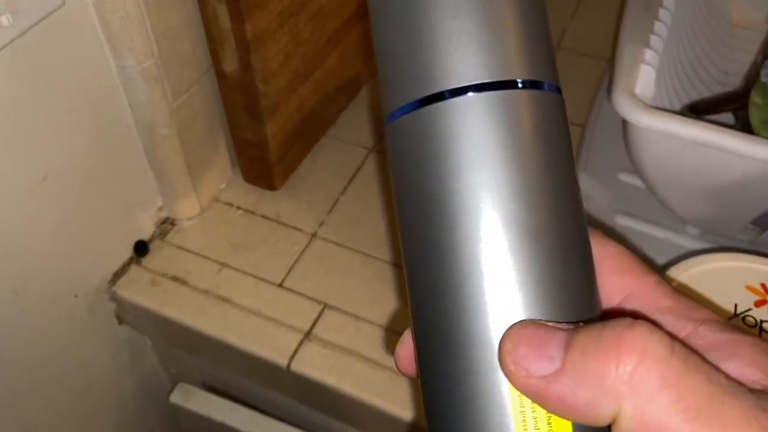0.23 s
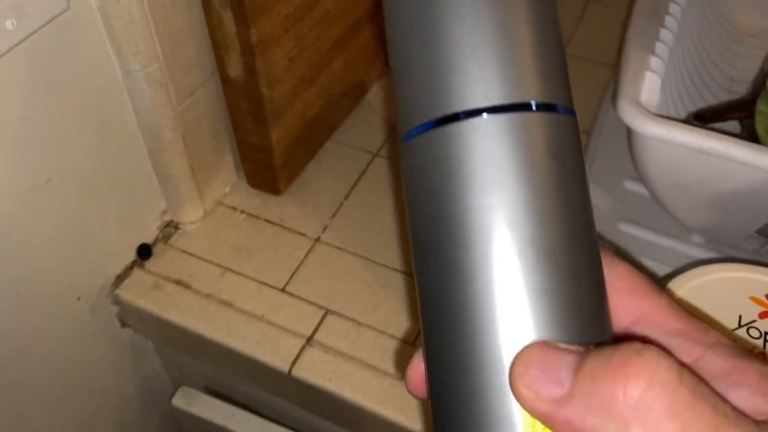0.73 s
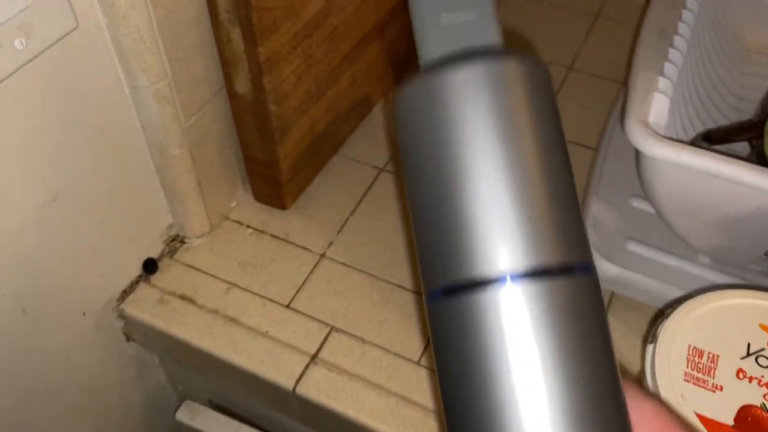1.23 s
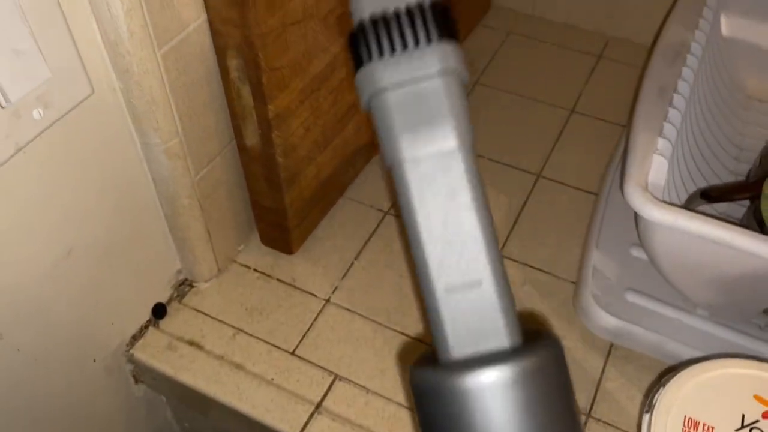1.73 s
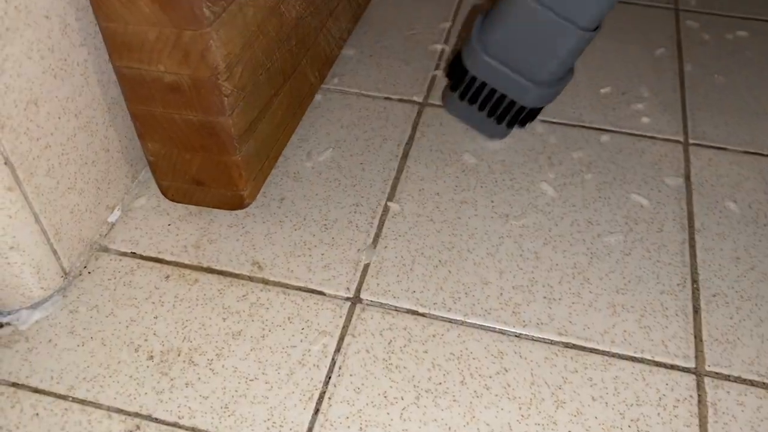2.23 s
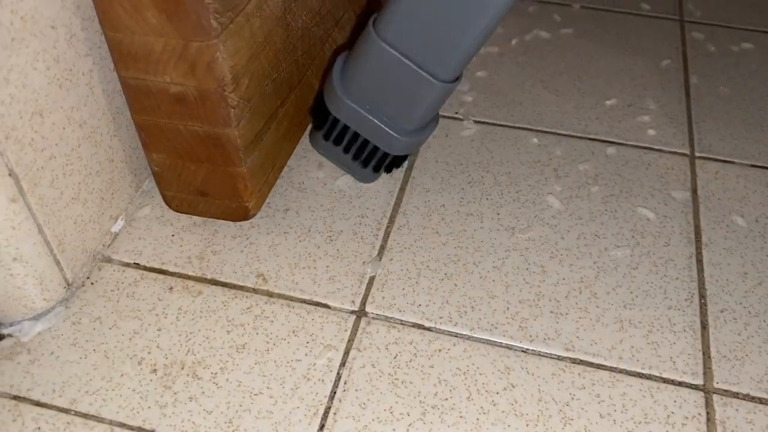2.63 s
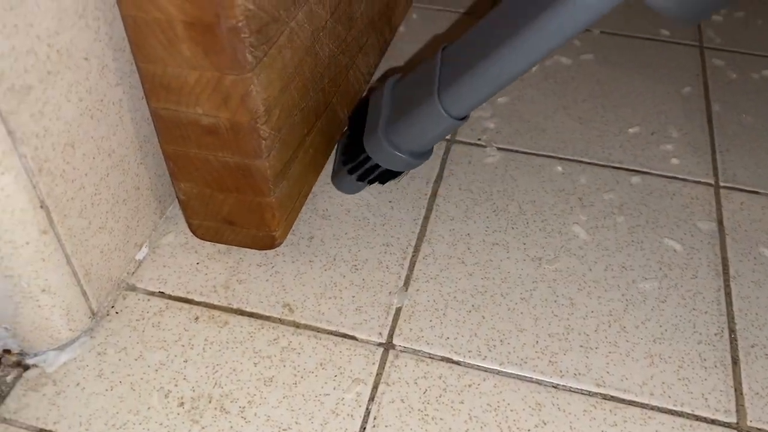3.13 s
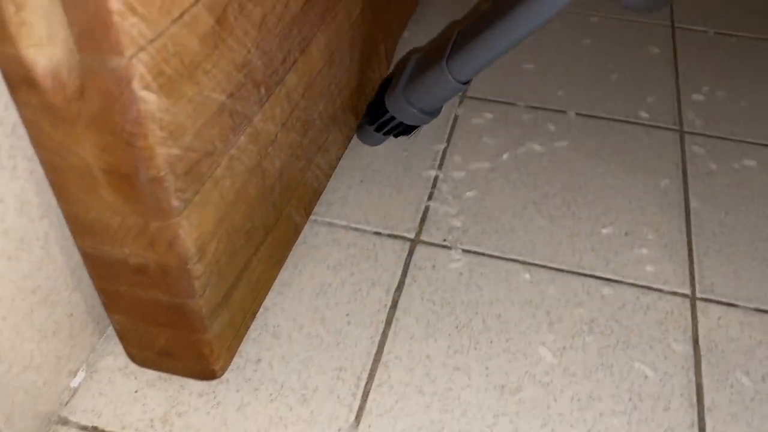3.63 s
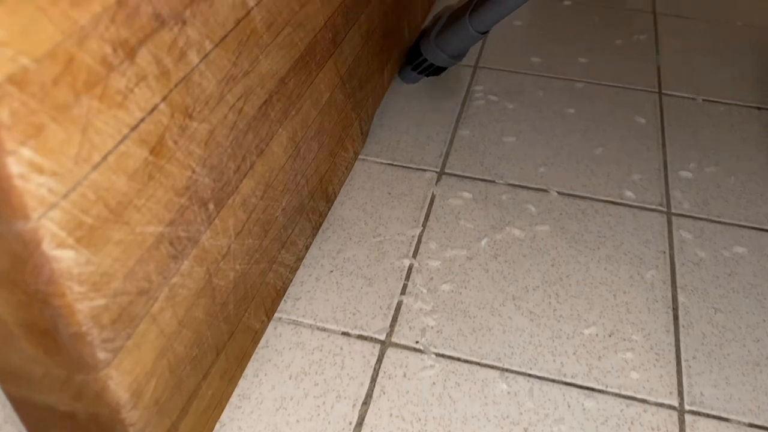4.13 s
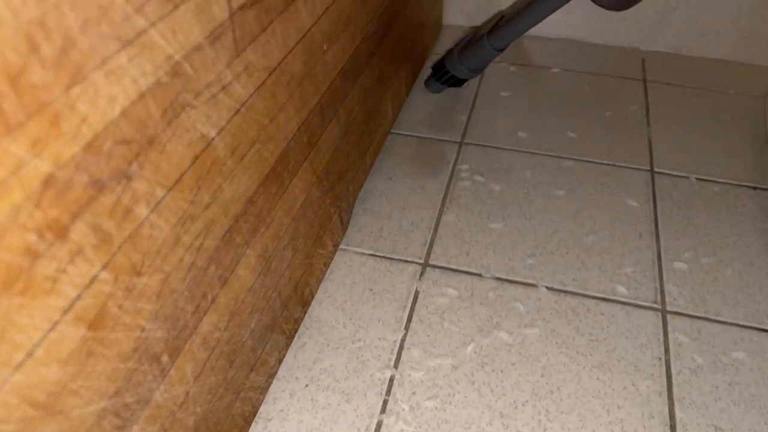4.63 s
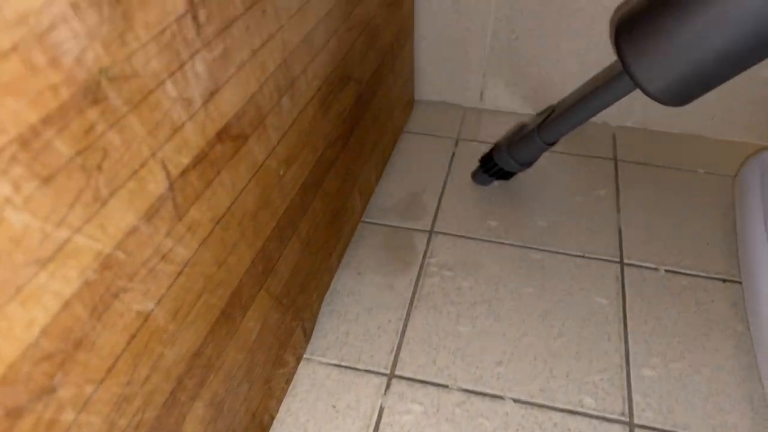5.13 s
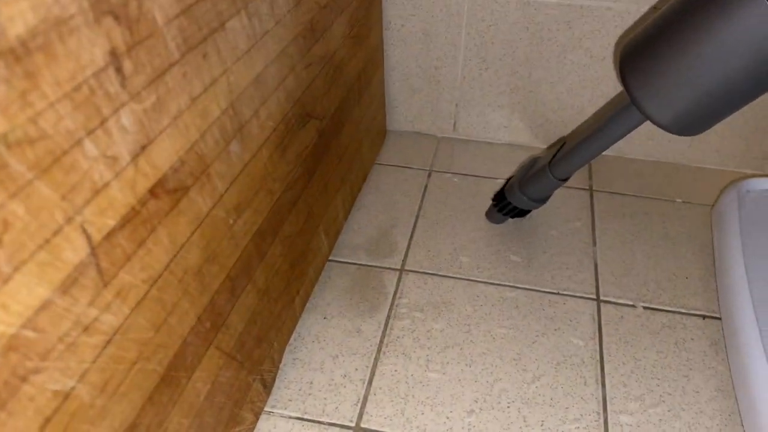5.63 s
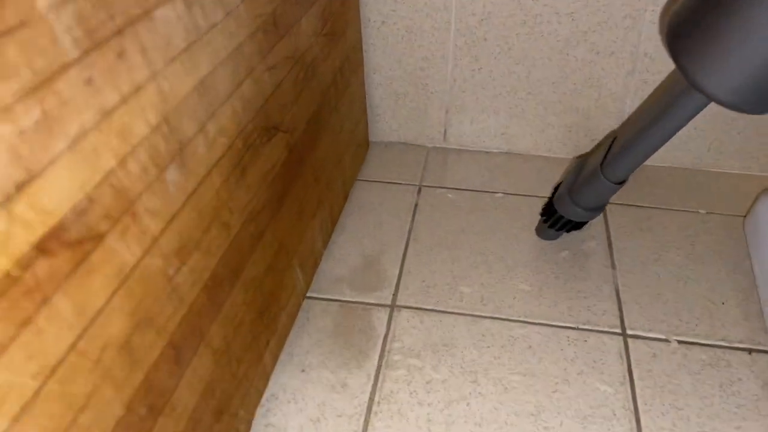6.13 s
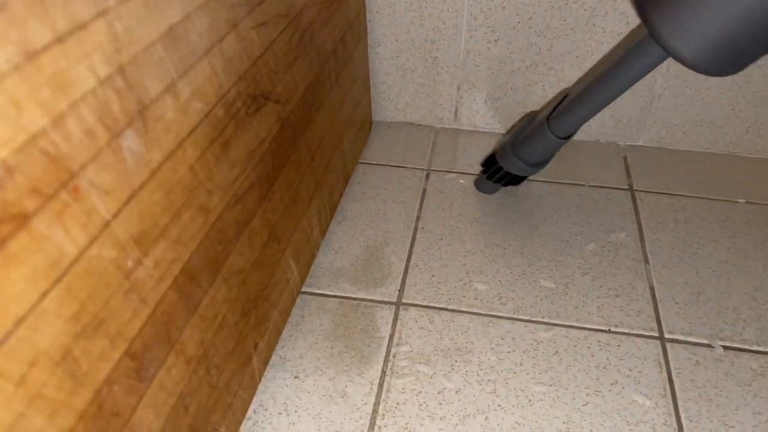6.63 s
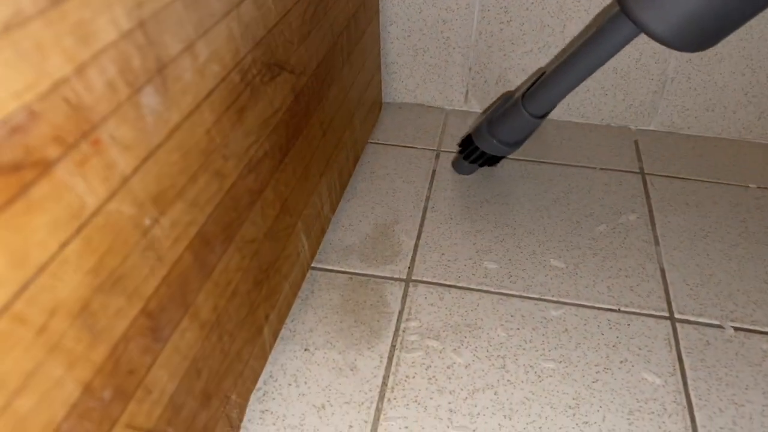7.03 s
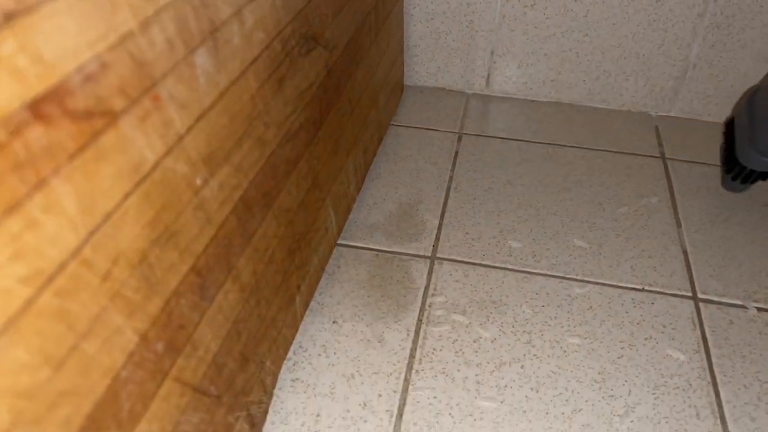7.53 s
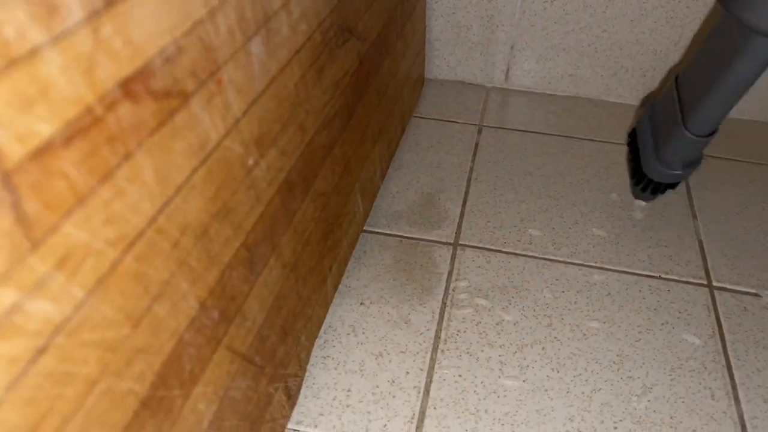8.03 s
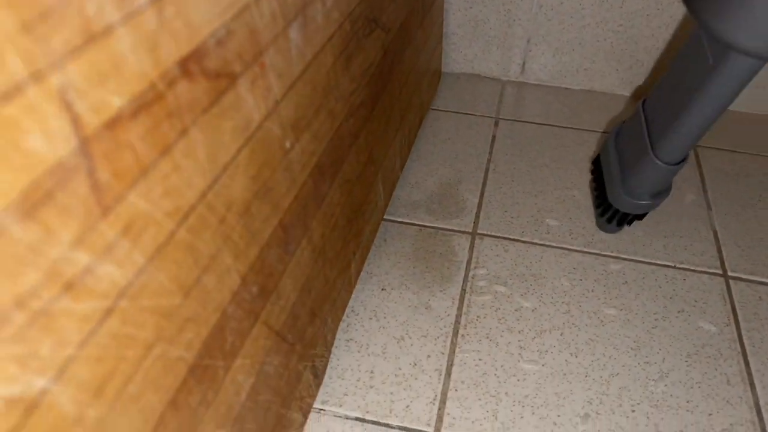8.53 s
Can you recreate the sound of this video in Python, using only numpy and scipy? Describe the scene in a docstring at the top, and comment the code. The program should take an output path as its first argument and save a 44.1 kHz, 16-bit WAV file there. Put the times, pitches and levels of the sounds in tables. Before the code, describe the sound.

From 0 to 1.9 seconds a small hard-surfaced room is quiet: a distant appliance hums low with a rapid throb, under faint hand and clothing rustle. Fingers tick the plastic shell lightly; two dull thumb taps and a small switch spring-back come around 0.3 to 0.37, with a clearer click at 1.38 and small ticks near 1.65. A tiny silence follows at 1.9, then a handheld vacuum is instantly at full speed, close and loud, with no spin-up. Steady high whine in several pitches wavers over a bright rush of air whose hollow resonances glide as the nozzle moves. Grit cracks sharply, mostly from 2.1 to 3.5, strongest near 3.24, with more at 6.1, 6.54, 6.75 and 8.5. The lowest whine swells after 6.4. A rapid cluster of hollow bumps lands at 7.3; higher whine surges near 8.05, and the vacuum is still running at 8.8.

```python
"""Handheld vacuum in a small tiled room

Heard through a close microphone pair: a distant appliance hums in throbs under a few finger ticks and taps.
After a brief silence the vacuum is at full speed: sines on shaft orders whine, and coloured noise is the air.
Noise cracks ring the cup as grit and the tube as crumbs; struck decaying modes are bumps on something hollow.
Gliding resonances and short echoes shift the colour of the air as the nozzle moves along floor and corners."""
import sys
import numpy as np
from scipy import signal
from scipy.fft import rfft, irfft, next_fast_len
from scipy.io import wavfile
from scipy.ndimage import map_coordinates

SR = 44100
rng = np.random.default_rng(int(sys.argv[2]) if len(sys.argv) > 2 else 0)


def digitize_waveform(pressure):
    """Quantize a signal to 16-bit integers and store it at the path in sys.argv[1].

    Rows of a 2-D input are taken as channels; values are limited to [-1, 1].
    """
    field = np.atleast_2d(pressure).T
    bounded = np.clip(field, -1, 1)
    quanta = np.round(bounded * 32767).astype(np.int16)
    wavfile.write(sys.argv[1], SR, quanta)


N = 387198

T = np.arange(N) / SR
AIR_TOP_HZ = 15750
# silence before the vacuum: (start t/s, end t/s)
SILENCE = (1.8935, 1.914)
# airflow, each level heard against its own mean over time:
# (t/s, lows level/dB, mids level/dB, upper mids level/dB, treble level/dB, left minus right/dB)
AIR_PATH = [(1.93, -34.5, -35.5, -38, -28.5, 3), (2.04, -40.5, -33, -41, -31, 3),
            (2.1, -37, -32.5, -40, -30.5, 1.5), (2.63, -37, -33.5, -38, -36, 2),
            (3.32, -34, -31.5, -33, -31.5, 1.5), (3.64, -31, -32.5, -33.5, -31.5, 2.5),
            (4.59, -39, -31.5, -35.5, -32, 4), (5.07, -38, -30.5, -31.5, -32, 2.5),
            (5.42, -42.5, -29.5, -33, -32, 3), (6.39, -37.5, -32.5, -29.5, -30.5, 3.0),
            (6.56, -37.5, -28, -29.5, -29, 3), (7.11, -37.5, -28.5, -32, -32, 4),
            (7.34, -35.5, -30, -33, -29.5, 6), (7.4, -37.5, -31, -33, -30, 1.5),
            (7.61, -37.5, -31.5, -35.5, -31, 4), (7.89, -36.5, -33, -29.5, -32, 4.5),
            (8.01, -37.5, -33.5, -32, -32, 3), (8.77, -36.5, -37, -32, -31, 6)]


def from_db(db):
    """Decibels to gain."""
    return 10 ** (np.asarray(db) / 20)


def in_time(rows, t=T):
    """Columns of a table, joined by straight lines."""
    s, *columns = np.transpose(rows)
    return np.array([np.interp(t, s, c) for c in columns])


def drift(rate, count):
    """Rows of smooth chance through knots of spread 1, rate knots per second."""
    knots = rng.standard_normal((count, 400))
    places = np.meshgrid(np.arange(count), T[::64] * rate, indexing="ij")
    return map_coordinates(knots, places, order=3).repeat(64, axis=1)[:, :N]


def patchwork(shape, hz, s, patch_hz, patches_per_s):
    """Chance over frequency and time, joined by straight lines."""
    places = np.meshgrid(hz / patch_hz, s * patches_per_s, indexing="ij")
    return map_coordinates(rng.standard_normal(shape), places, order=1)


def pair(near, far):
    """The right port hears the left one's sound turned in phase, blended with unrelated room sound."""
    # microphone pair, the treble arriving about a quarter millisecond later on the left:
    # (f/Hz, likeness/0-1, right lead/rad)
    ports = [(0, 1, -0.5), (185, 0.82, 0.25), (540, 0.86, 1.63), (815, 0.74, 1.42), (1010, 0.8, 0.99),
             (1300, 0.48, 1.56), (1690, 0.47, 2.5), (2040, 0, 5.5), (2520, 0.78, 5), (3400, 1, 5.4),
             (4500, 1, 5.5), (4830, 0.98, 6.5), (5670, 0.54, 9), (5890, 0.1, 7.5), (6170, 1, 5),
             (15180, 1, 19), (17100, 0.6, 57)]
    size = next_fast_len(N)
    alike, lead = in_time(ports, np.fft.rfftfreq(size, 1 / SR))
    alike = np.clip(alike, 0, 1)
    shared = alike * np.exp(1j * lead) * rfft(near, size)
    unrelated = np.sqrt(1 - alike ** 2) * rfft(far, size)
    return np.array([near, irfft(shared + unrelated, size)[:N]])


def shaped_noise(colour, change):
    """Stereo noise of rms about 1 in a colour, then a gain for every frequency and moment."""
    hz, s, cells = signal.stft(pair(*rng.standard_normal((2, N))), SR, nperseg=1024)
    hz = np.maximum(hz, 1)
    colour_hz, colour_db = np.transpose(colour)
    shape_db = np.interp(np.log(hz), np.log(colour_hz), colour_db)
    shape = from_db(shape_db - 35 * (hz > AIR_TOP_HZ))
    shape /= np.sqrt(np.mean(shape ** 2))
    cells = cells * shape[:, None] * change(hz, s)
    return signal.istft(cells, SR)[1][:, :N]


def bursts(events, modes, tail_db):
    """Each event is a sharp crack of noise with a longer tail; both ring the broad modes of a body."""
    length = 8000
    t = T[:length]
    puffs = np.zeros((2, N)) + 1e-18
    rise = np.minimum(t / .0008, 1)
    noise = rng.standard_normal((len(events), 2, length)) * rise
    for (s, strike_db, t60), puff in zip(events, noise):
        i = int(s * SR)
        fall_db = 60 * t / max(t60, .005)
        decay = from_db(-4 * fall_db) + from_db(tail_db - fall_db)   # crack, then tail
        puffs[:, i:i + length] += (puff * from_db(strike_db) * decay)[:, :N - i]
    out = 0
    for k, (hz, width_hz, level_db) in enumerate(modes):
        r = np.exp(-np.pi * width_hz / SR)
        feed = np.array([1, 0, -1]) * (1 - r * r) / 2
        ring = [1, -2 * r * np.cos(2 * np.pi * hz / SR), r * r]
        boost = np.sqrt(SR / width_hz) / 8   # narrow modes take less of the noise
        out = out + (-1) ** k * boost * from_db(level_db) * signal.lfilter(feed, ring, puffs)
    return pair(*out)


def hum():
    """Distant appliance: harmonics of a slow beat, so the hum throbs; both ports hear it alike."""
    # harmonics: (multiple of the beat, level/dB before swell)
    harmonics = [(3, -67), (6, -44), (7, -61), (8, -49), (9, -40), (10, -53), (11, -54.5), (12, -53.5),
                 (13, -48), (14, -62), (15, -51), (17, -43.5), (18, -45), (19, -52), (23, -56), (24, -57),
                 (26, -59), (27, -56), (28, -58), (32, -64), (33, -64), (35, -68), (38, -72), (39, -63.5),
                 (47, -70), (48, -64)]
    # swell, each level heard against its own mean: (t/s, low orders level/dB, upper orders level/dB)
    swells = [(0, -36, -42.5), (1.7, -35, -43), (2.7, -38.5, -40), (4.3, -37, -39), (5.3, -36, -35),
              (6.0, -36.5, -37.5), (6.4, -33.5, -35), (8.78, -37.5, -38.5)]
    beat_hz = 9.645
    low_db, upper_db = in_time(swells)
    out = 0
    for (k, level_db), start in zip(harmonics, rng.uniform(0, 2 * np.pi, len(harmonics))):
        swell_db = low_db - low_db.mean() if k < 11 else upper_db - upper_db.mean()
        waver = drift(2.96, count=2)
        phase = 2 * np.pi * k * beat_hz * T + start + 0.25 * waver[1]
        out = out + np.sqrt(2) * from_db(level_db + swell_db + 1.2 * waver[0]) * np.sin(phase)
    return out


def room_tone():
    """Steady rumble below, a faint flickering rustle of hand and clothes and thin whistles above."""
    # quiet room: (f/Hz, relative level/dB per Hz)
    room_colour = [(25, -12), (45, -11.5), (100, 2.5), (150, -9.5), (205, -15), (270, -9), (400, -22),
                   (600, -20.5), (900, -32.5), (2000, -37), (3000, -43), (4500, -46), (9000, -48),
                   (14000, -45), (15700, -44)]
    # rustle around 1.8 kHz: (t/s, boost level/dB)
    rustle = [(0, -0.5), (.3, 2.5), (.6, 1.5), (.9, 2.5), (1.2, 2.5), (1.45, 5.5), (1.7, 8), (1.89, 6.5)]
    # thin unsteady whistles: (f/Hz, starting level/dB, fade/dB per s, wobble/rad)
    thin_tones = [(2590, -71, 1.5, 2.5), (3150, -79, 0, 5), (3548, -77, 0, 3), (4560, -80, 0, 6)]
    room_db = -43

    def change(hz, s):
        flicker = np.interp(s, np.arange(300) / 25, rng.standard_normal(300))
        rustle_db = np.exp(-np.log2(hz / 1800) ** 2 / 2.7)[:, None] * in_time(rustle, s)
        treble = np.clip(np.log2(hz / 3000), 0, 1)[:, None]
        return from_db(room_db + rustle_db + 4.5 * treble * flicker)

    whistles = 0
    for hz, level_db, fade_db, wobble in thin_tones:
        gain = from_db(level_db - fade_db * T + 3 * drift(25, count=2))
        whistles = whistles + gain * np.sin(2 * np.pi * hz * T + wobble * drift(42, count=2))
    return shaped_noise(room_colour, change) + pair(*whistles)


def fingers():
    """Fingers crack against the plastic shell, the thumb taps the switch and the switch springs back."""
    # fingers on the shell: (t/s, strike level/dB, t60/s)
    touches = [(0.1476, -54, 0.2), (0.8744, -50, 0.19), (1.3764, -32.5, 0.37), (1.6402, -53, 0.2),
               (1.6706, -46.5, 0.22)]
    # plastic shell: (f/Hz, width/Hz, level/dB before the width boost)
    shell = [(600, 500, -11), (1250, 400, -5), (2300, 1500, -4), (3520, 350, -4.5), (4650, 800, -4),
             (6200, 2500, 0.5), (10000, 4700, 3), (15000, 2100, 1)]
    # dull taps as the thumb presses the switch: (t/s, strike level/dB, t60/s)
    thumb = [(.2957, -50, .04), (.3362, -32, .07)]
    # body under the thumb: (f/Hz, width/Hz, level/dB before the width boost)
    thumb_body = [(450, 300, 4), (720, 200, 2.5), (1330, 210, 1), (2200, 390, -1), (5000, 3400, -7)]
    # the switch springs back: (t/s, strike level/dB, t60/s)
    spring_back = [(.3668, -38, .06)]
    # switch: (f/Hz, width/Hz, level/dB before the width boost)
    switch_body = [(2680, 350, 4), (1900, 700, -4)]
    taps = bursts(thumb, thumb_body, tail_db=-8)
    tick = bursts(spring_back, switch_body, tail_db=-3)
    return taps + tick + bursts(touches, shell, tail_db=-7.5)


def whine():
    """Fan: sines on multiples of the shaft speed; reflections make each one waver."""
    # fan speed: (t/s, blade tone f/Hz)
    speed = [(1.95, 5072), (2.8, 5071), (3.7, 5092), (4.2, 5073), (4.5, 5082), (5.2, 5092), (6.45, 5093),
             (7.3, 5087), (7.95, 5065), (8.3, 5071), (8.78, 5063)]
    # swells as the body turns among the room's standing waves: (t/s, order 1 level/dB, order 2 level/dB,
    # order 3 level/dB, blade tone level/dB, order 4.86 level/dB,
    # order 1 left minus right/dB, order 1 right lead/rad)
    swells = [(1.95, -36.5, -36, -42, -40.5, -49, -3, -2.3),
              (2.45, -33.5, -36.5, -44, -40.5, -49, 4.5, -2.5), (2.95, -30, -36, -42, -42, -43, 1, -2.1),
              (3.45, -35.5, -34, -42, -43, -43, -0.5, -1.9), (3.85, -33, -36, -37, -45.5, -40, -8, -1.5),
              (4.2, -37, -39, -43, -40.5, -48, 1.5, -2.6), (4.7, -30, -38, -42, -39.5, -45, 5, -2.5),
              (5.2, -37.5, -47, -40, -37, -42, 1, -2.75), (5.7, -34, -46, -45, -40.5, -40, 1.5, -3.0),
              (6.1, -32.5, -44, -44, -37.5, -42, -1.5, -3.2), (6.45, -24.5, -40, -40, -43, -40, -2.5, -3.8),
              (6.95, -27, -36, -39, -41, -38, -6, -3.8), (7.35, -22, -42, -43, -37, -45, 1, -3.5),
              (7.8, -33.5, -40, -36, -36, -37, 0, -2.8), (8.05, -37, -37.5, -29, -29.5, -38, 1, -2.1),
              (8.45, -26, -37, -37, -37, -44, 1, -1.9), (8.78, -26.5, -38, -37, -37, -40, -1, -1.8)]
    # (t/s, then left minus right/dB and right lead/rad of order 2, of order 3 and of the blade tone)
    side_path = [(1.95, 2, 0.8, -2, 1.1, 1, 4.5), (2.7, 9, 1.45, -14, 2, 2.2, 3.5),
                 (3.3, 3, 1.05, -12, 2, 5.6, 1), (4.0, -1, 2.4, -3, 1.4, 4.2, 0.5),
                 (4.9, -1, 6.2, 4, 1.2, 2.3, 2.5), (5.601, -8, 3.3, 3, 0.87, 5, -0.5),
                 (6.2, -6, 3.3, 2.5, 1.2, 12, -1), (6.7, -3, 3.6, 9, 1.7, 9.7, 4),
                 (7.5, -3.5, 2.2, -11, 3.3, 5.7, 2), (8.1, -5, 3, -3, 2.2, 6.8, 3.5),
                 (8.78, 1, 1.6, -2, 2.7, 16.5, 3.5)]
    # weaker whine: (multiple of shaft speed, level/dB)
    weak_orders = [(1.141, -50), (1.326, -51), (4, -51), (9, -54), (10, -53), (14, -57), (21, -56)]
    # order 5, strongest early on: (t/s, level/dB)
    fifth = [(1.92, -54), (2.4, -46), (2.75, -45), (3.1, -54), (8.78, -56)]
    # order 6 comes and goes: (t/s, level/dB)
    sixth = [(1.92, -53), (2.7, -54), (3.2, -42), (4.0, -50), (4.5, -47), (5.0, -47), (5.3, -43),
             (6.2, -41), (6.9, -44), (7.6, -53), (8.78, -52)]
    blades = 7
    blade_hz, = in_time(speed)
    first_db, second_db, third_db, blade_db, odd_db, pan_db, lead = in_time(swells)
    turn = 2 * np.pi * np.cumsum(blade_hz / blades) / SR
    sides = np.array([[.5], [-.5]])   # left, right
    first_gain = from_db(first_db + sides * pan_db + 1.13 * drift(12, count=2))
    out = np.sqrt(2) * first_gain * np.sin(turn + [0 * lead, lead])
    strong = zip((2, 3, blades), (second_db, third_db, blade_db), in_time(side_path).reshape(3, 2, N))
    for k, level_db, (own_db, lead) in strong:
        waver_db = 1.5 * drift(15, count=2) + .3 * k * drift(5, count=1) + 1.0 * drift(3.5, count=2)
        lead = lead * [[0], [1]] + 0.14 * drift(6, count=2)
        lead += (k == 3) * .6 * drift(30, count=1)   # order 3 is rough
        out += np.sqrt(2) * from_db(level_db + sides * own_db + waver_db) * np.sin(k * turn + lead)
    odd_gain = from_db(odd_db + 1.1 * drift(9, count=2))
    upper = np.sqrt(2) * odd_gain * np.sin(4.86 * turn + .5 * drift(25, count=2))
    for k, level_db in weak_orders + [(5, in_time(fifth)[0]), (6, in_time(sixth)[0])]:
        swell = drift(2.275, count=2) + 1.0 * drift(18, count=2)
        wobble = .6 * drift(25, count=2)
        upper = upper + np.sqrt(2) * from_db(level_db + 3 * swell) * np.sin(k * turn + wobble)
    return out + pair(*upper) * from_db(sides * in_time(AIR_PATH)[-1])


def airflow():
    """Turbulent rush; near surfaces tilt its bands, add hollow resonances and send echoes that wander."""
    # centres of the four airflow bands: (f/Hz)
    band_centres = [800, 2700, 4300, 7000]
    # rush at the nozzle: (f/Hz, relative level/dB per Hz)
    rush_colour = [(60, -21), (200, -3.5), (460, -7.5), (620, -7.5), (1000, -0.5), (1550, -1.5),
                   (2300, 4.5), (3200, -0.5), (4900, -5), (5350, -6.5), (6500, -7), (7600, -9),
                   (9200, -11.5), (10600, -10.5), (13500, -8), (15400, -3.5)]
    # resonances and dips between nozzle, floor and corner, gliding as the nozzle moves:
    # (width/Hz, share of the boost at the right port, track of (t/s, f/Hz, boost level/dB))
    hollows = [ (114, 0.81, [(1.92, 2520, 8), (2.2, 2520, 6), (2.5, 2610, 5.5), (2.8, 2520, 8.5),
               (3.2, 2750, 1), (3.5, 2650, 6.5), (3.8, 2460, 9), (4.1, 2340, 4), (4.35, 2230, -4),
               (4.7, 2350, 5.5), (5.3, 2220, 9), (6.3, 2395, 14), (6.5, 2380, -0.5), (7.3, 2400, -1.5),
               (7.6, 2270, 8), (8.2, 2200, 9.5), (8.78, 2200, 10.5)]), (122, 0.94, [(1.92, 3250, 8),
               (2.4, 2970, 1.5), (2.8, 3130, 9.5), (3.4, 2970, 11), (3.8, 3050, 5.5), (4.07, 2990, 8),
               (4.2, 3040, 11), (4.4, 3150, 12), (4.75, 3160, 8.5), (4.95, 3270, 8), (6.3, 3180, 5),
               (6.45, 2910, 8), (7.2, 2950, 4.5), (7.5, 2960, -5.5), (8.78, 3050, 4.5)]),
               (137, 0.46, [(1.92, 3640, 5), (2.5, 3630, 3), (2.8, 3620, 1), (3.1, 3800, 2),
               (3.45, 3940, 7), (3.9, 3770, 3.5), (4.25, 3840, 9.5), (5.3, 3600, 1.5), (6.3, 3800, 3),
               (7.0, 3900, 8), (7.25, 3900, -2)]), (172, 1.17, [(4.5, 4600, 1.5), (4.9, 4700, 5.5),
               (5.2, 4460, 8), (5.55, 4020, 9.5), (6.2, 4170, 5), (6.7, 4720, 5), (7.0, 4580, 2),
               (7.7, 4960, 6.5)]), (110, 0.75, [(4.8, 3960, 3), (5.4, 3740, -8), (6.2, 3730, -7),
               (6.7, 4270, -13), (7.2, 4300, -1), (7.4, 4200, -3)]), (97, 1.1, [(1.92, 1240, 7),
               (3.5, 1180, 5), (4.4, 990, 1), (5.2, 860, 10), (6.3, 900, 8), (7.9, 1200, 7),
               (8.78, 1240, 8)]), (110, 0.75, [(4.5, 2630, -3.5), (5.2, 2620, 2.5), (6.2, 2680, -6),
               (6.5, 2580, -1.5), (8.3, 2480, -2), (8.6, 2500, -9)]), (256, 0.75, [(3.7, 1790, 2),
               (4.3, 1860, -3), (6.2, 1530, -3), (7.5, 1600, -11), (7.95, 1680, -2), (8.78, 1780, 0.5)]),
               (65, 0.88, [(1.92, 424, 2.5), (2.8, 383, 4.5), (3.3, 485, -7), (4.2, 480, 4.5),
               (6.0, 426, 7.5), (8.0, 460, 13.5), (8.78, 468, 11.5)]), (130, 0.68, [(2.3, 3400, -1),
               (2.75, 3350, -10), (3.2, 3630, -3), (3.6, 3380, -1)]), (90, 0.45, [(3.7, 2780, 3.5),
               (4.1, 2810, 7), (4.6, 2800, 6), (4.8, 2780, 2.5)]), (99, 1.2, [(2.7, 2100, -6),
               (3.2, 2080, 2.5), (3.6, 2100, -5), (4.0, 2260, 1), (4.3, 2200, -5)]), ]
    # from near surfaces: (mean delay/ms, share)
    reflections = [(1.9, 0.27), (2.7, 0.21), (3.6, 0.043), (5.2, 0.21), (7.5, 0.33), (10.5, 0.66)]
    # the body turns, so the right port hears the rush earlier or later:
    # (t/s, added right lead/rad in the low band, in the middle band, in the high band)
    turning = [(1.92, -1.3, -0.53, 0.38), (2.998, -0.7, -0.098, -0.52), (4.2, -0.3, -0.81, 2.1),
               (5.4, 3.5, -0.05, 0.64), (5.9, 0.5, -0.27, 0.76), (7.5, -4, -0.78, 0.49),
               (7.9, -2.5, -1.3, 1.7), (8.78, -2.3, -0.5, 1.3)]
    # bands of that lead: (f/Hz, width/Hz)
    turning_bands = [(2150, 173), (2950, 450), (4800, 180)]
    air_db, echo_top_hz = -26.5, 5560

    def change(hz, s):
        *bands, pan_db = in_time(AIR_PATH, s)
        bands = np.array(bands)
        bands -= bands.mean(axis=1, keepdims=True)
        tilt = np.array([np.interp(np.log(hz), np.log(band_centres), b) for b in bands.T]).T
        tilt = np.array([tilt, tilt])
        for width_hz, right_share, track in hollows:
            centre_hz, boost_db = in_time(track, s)
            peak = boost_db / (1 + ((hz[:, None] - centre_hz) / width_hz) ** 2)
            tilt += np.array([1, right_share])[:, None, None] * peak
        # bass and treble get no panning and no echoes
        mids = (np.clip((hz - 250) / 300, 0, 1) * np.clip((6800 - hz) / 1000, 0, 1))[:, None]
        echoing = mids * np.clip((echo_top_hz - hz) / 800, 0, 1)[:, None]
        lead = 0
        for rad, (band_hz, width_hz) in zip(in_time(turning, s), turning_bands):
            lead = lead + rad * np.exp(-((hz[:, None] - band_hz) / width_hz) ** 2 / 2)
        paths = 1   # the direct sound
        for delay_ms, share in reflections:
            wander = drift(.8, count=2)[:, np.minimum(s * SR, N - 1).astype(int)]
            lag = delay_ms / 1000 * (1 + 0.04 * wander[0])
            lag = lag + 6e-5 * wander[1] * [[1], [-1]]   # a little different at each port
            paths = paths + share * echoing * np.exp(-2j * np.pi * hz[:, None] * lag[:, None])
        # bass and treble swell in soft patches, the mids break into small eddies
        tilt += 1.0 * (1 - mids) * patchwork((60, 40), hz, s, patch_hz=400, patches_per_s=5.0)
        tilt += 2.0 * mids * patchwork((110, 140), hz, s, patch_hz=110, patches_per_s=10)
        tilt += np.array([mids * pan_db / 2, -mids * pan_db / 2])
        return paths * np.exp(1j * np.array([0 * lead, lead])) * from_db(tilt)

    flutter = from_db(0.65 * drift(30, count=1))
    return from_db(air_db) * flutter * shaped_noise(rush_colour, change)


def crumbs():
    """Larger crumbs are noise cracks that ring the nozzle tube."""
    # crumbs: (t/s, strike level/dB, t60/s)
    hits = [(2.001, -29, 0.068), (3.236, -27, .06), (8.415, -31, 0.044)]
    # nozzle tube: (f/Hz, width/Hz, level/dB before the width boost)
    tube = [(3210, 130, 8.5)]
    return bursts(hits, tube, tail_db=12)


def grit():
    """Grains that one can point at crack on the cup, and finer dust at random moments."""
    # grains on the cup: (t/s, strike level/dB)
    grains = [(2.1066, -19), (2.1309, -18), (2.153, -12), (2.337, -18), (2.4356, -15), (2.4813, -14.5),
              (2.8425, -15), (3.237, -6.5), (3.3009, -14), (3.3209, -16), (3.364, -20), (3.4132, -9.5),
              (3.4505, -17), (3.4585, -14), (3.7414, -14), (4.3833, -15), (4.4428, -21), (6.0811, -13),
              (6.54, -5), (6.7022, -20), (6.754, -9.5), (8.511, -15)]
    # cup: (f/Hz, width/Hz, level/dB before the width boost)
    cup = [(9040, 770, -1), (11500, 3000, 0), (15200, 800, 6), (3000, 2100, -1)]
    dust_count, loudest_dust_db, t60_s = 5, -23, .085
    start = SILENCE[1]
    dust = [(start + when * (T[-1] - start), loudest_dust_db - 6 * size)
            for when, size in rng.random((dust_count, 2))]
    return bursts([(s, db, t60_s) for s, db in grains + dust], cup, tail_db=-7)


def bumps():
    """The nozzle bumps something hollow: each blow strikes its decaying modes, each with its own strength."""
    # blows, before about 1 dB of chance and softening:
    # (t/s, hollow ring level/dB, knock level/dB, body level/dB, thump level/dB)
    blow_rows = [(7.3095, -21, -32, -32, -34), (7.3165, -12, -27, -28, -30), (7.3228, -20, -13.5, -28, -16),
                 (7.3365, -24, -22, -22, -30), (7.3455, -23, -27, -26, -16)]
    # hollow body: (f/Hz, t60/s)
    hollow_body = [(880, .04), (520, .045), (400, .04), (130, .06)]
    out, rows = 0, np.array(blow_rows)
    for (hz, t60), level_db in zip(hollow_body, rows[:, 1:].T):
        strength = from_db(level_db + rng.normal(0, 1, len(rows)))
        blows = np.zeros(N) + 1e-18
        blows[(rows[:, 0] * SR).astype(int)] = strength * rng.choice([-1, 1], len(rows))
        r = from_db(-60 / (max(t60, .01) * SR))
        w = 2 * np.pi * hz / SR
        out = out + signal.lfilter([0, np.sin(w)], [1, -2 * r * np.cos(w), r * r], blows)
    soft = signal.lfilter(np.hanning(20) / 9.5, 1, out)   # a blunt contact
    return pair(soft, soft)


def scene():
    """Hum, room and fingers sound on both sides of the silence; the vacuum joins after it."""
    before = np.clip((SILENCE[0] - T) / .002, 0, 1)
    running = np.clip((T - SILENCE[1]) / .004, 0, 1)
    room = hum() + room_tone() + fingers()
    vacuum = whine() + airflow() + crumbs() + grit() + bumps()
    return (before + running) * room + running * vacuum


def record(dry):
    """The top falls by a 6 dB step, then a steep low-pass cuts it."""
    cutoff_hz = 16550
    size = next_fast_len(N)
    step = from_db(-6 * (np.fft.rfftfreq(size, 1 / SR) > AIR_TOP_HZ))
    stepped = irfft(rfft(dry, size) * step, size)[:, :N]
    return signal.sosfilt(signal.ellip(10, .5, 70, cutoff_hz, fs=SR, output="sos"), stepped)


dry = scene()
out = record(dry)
digitize_waveform(out)
```